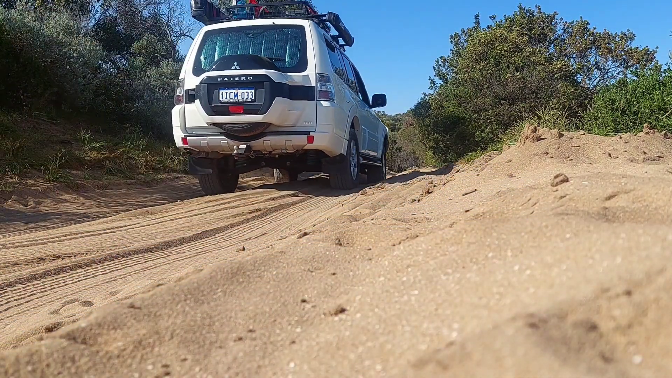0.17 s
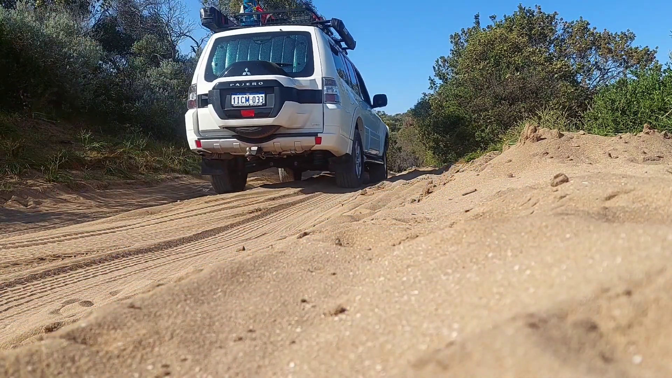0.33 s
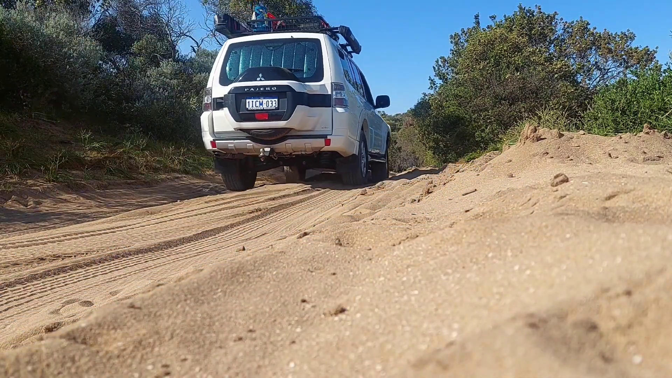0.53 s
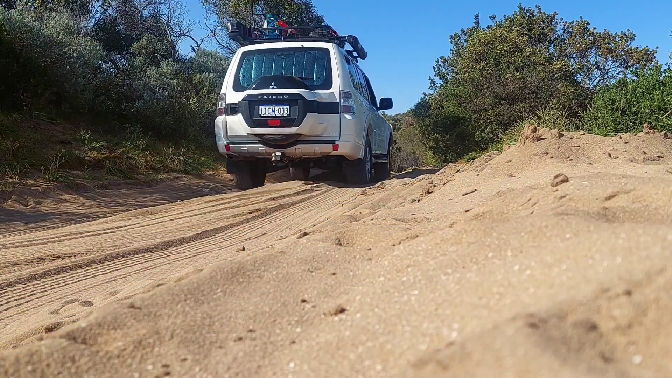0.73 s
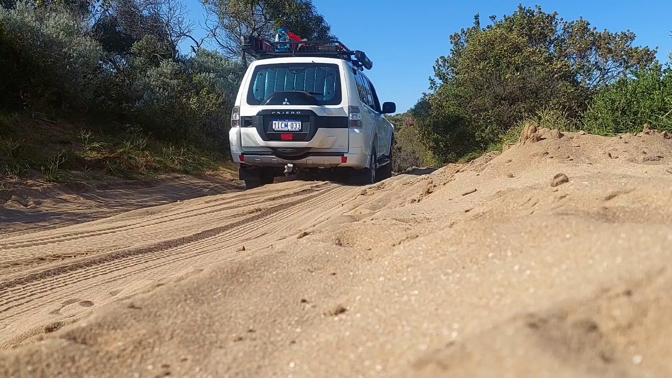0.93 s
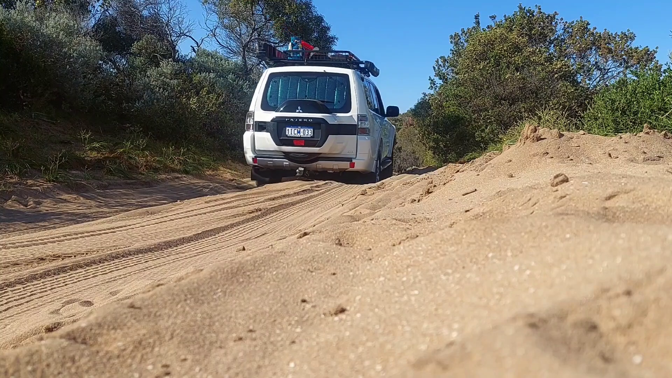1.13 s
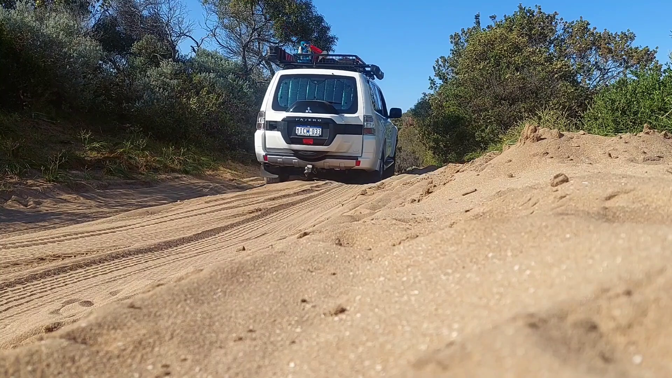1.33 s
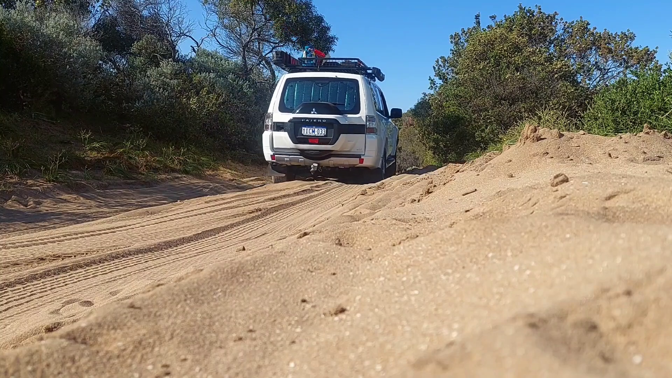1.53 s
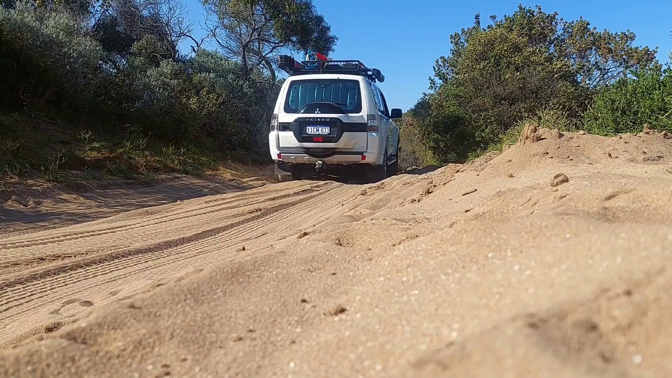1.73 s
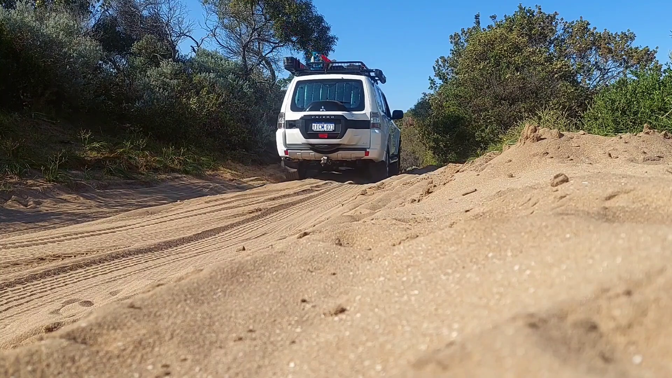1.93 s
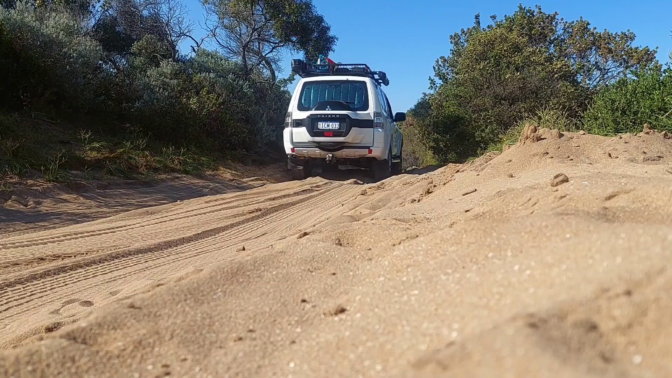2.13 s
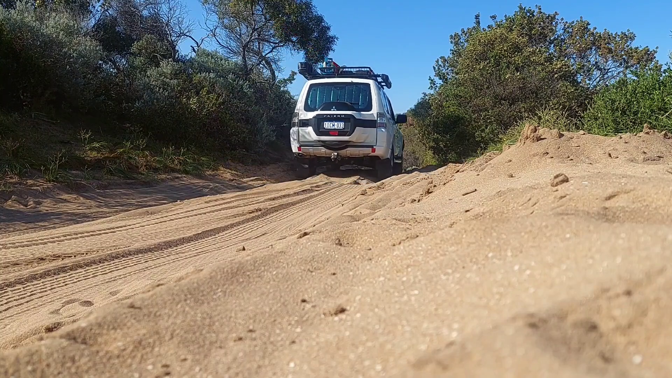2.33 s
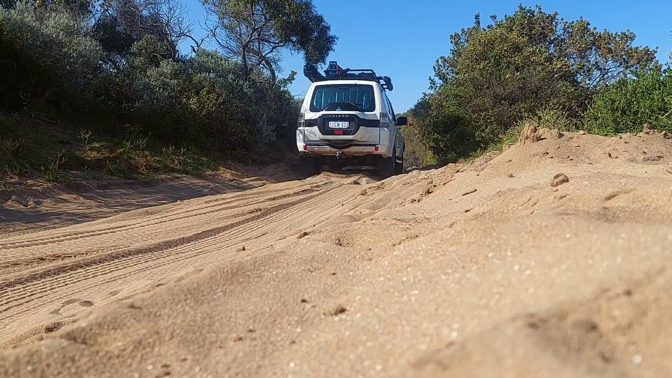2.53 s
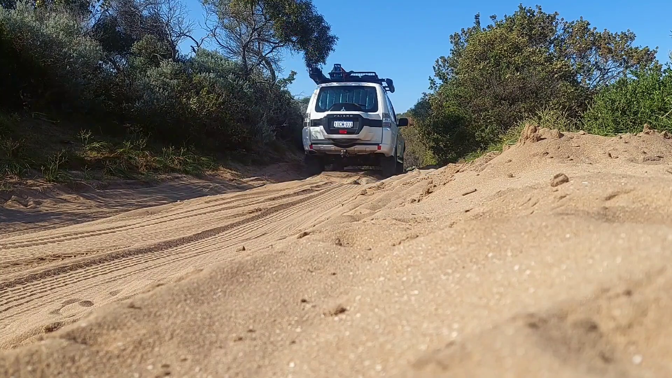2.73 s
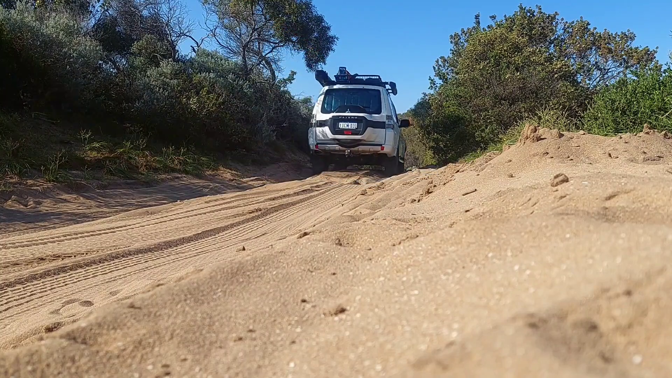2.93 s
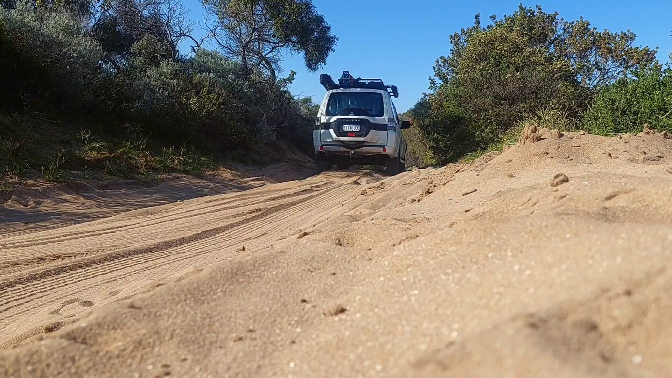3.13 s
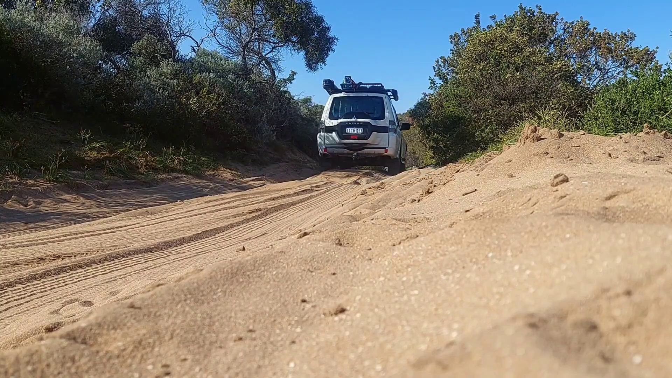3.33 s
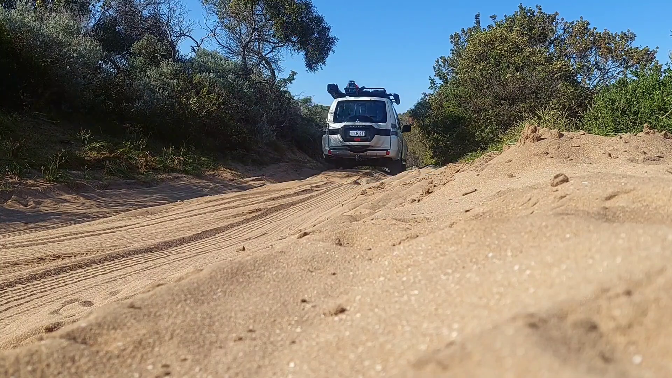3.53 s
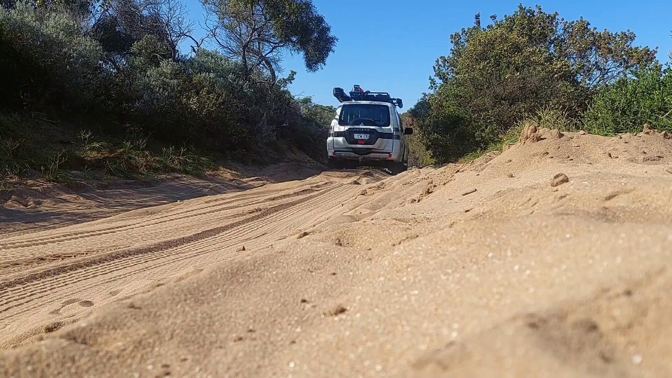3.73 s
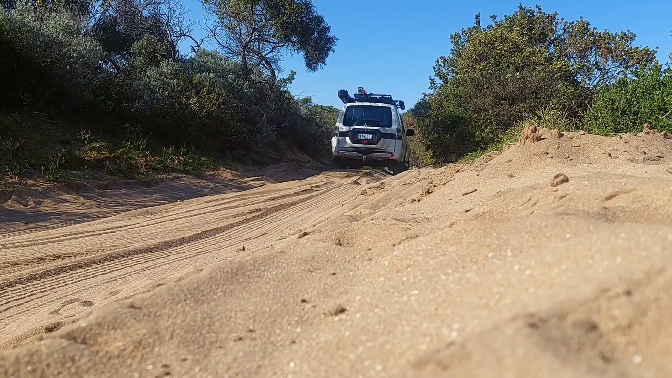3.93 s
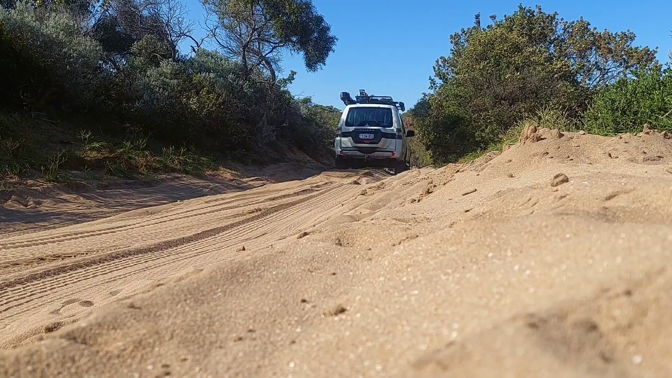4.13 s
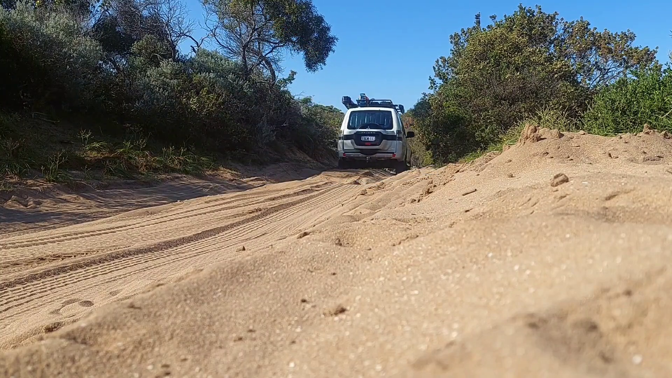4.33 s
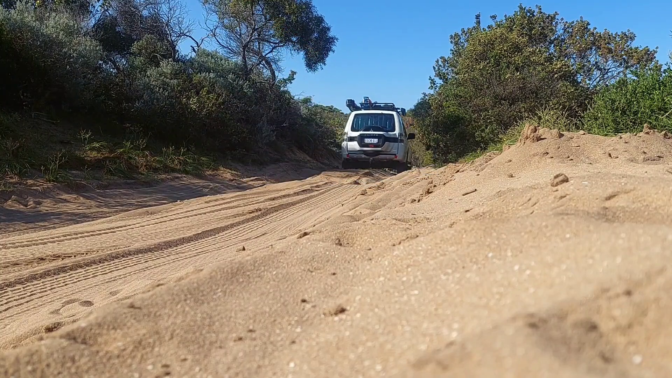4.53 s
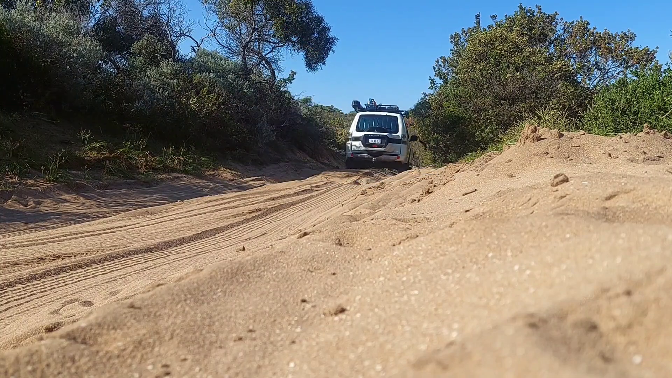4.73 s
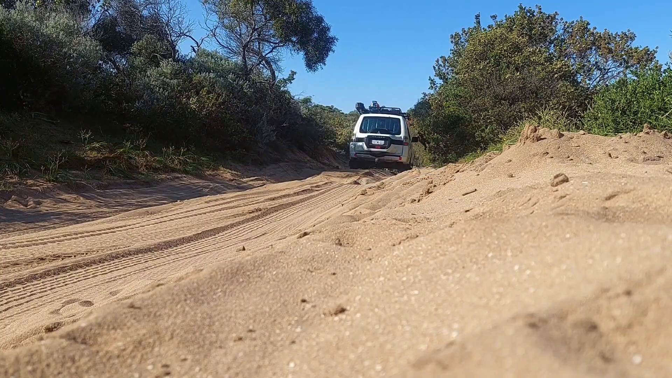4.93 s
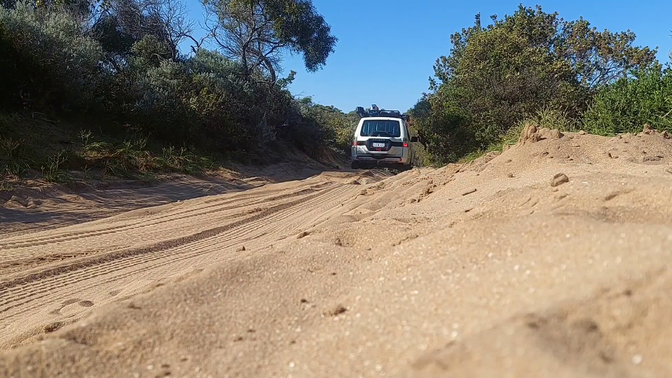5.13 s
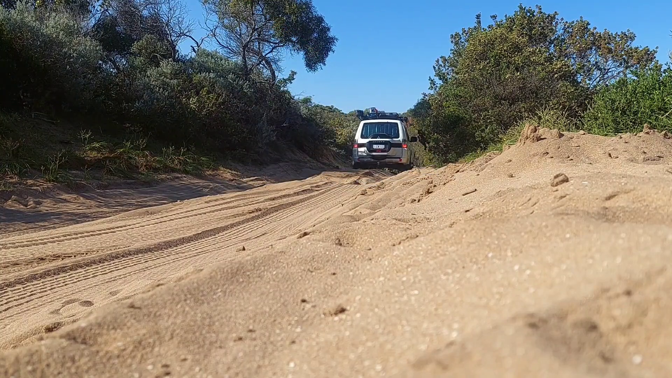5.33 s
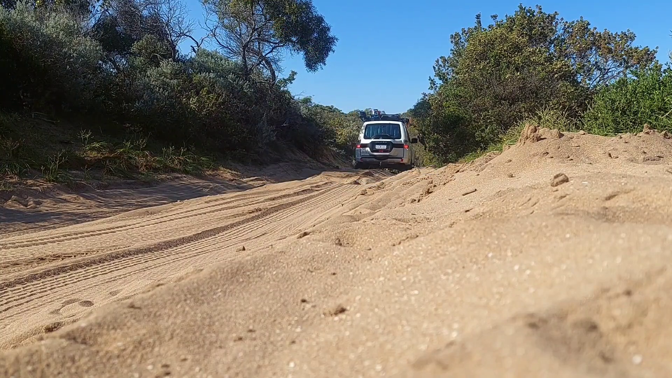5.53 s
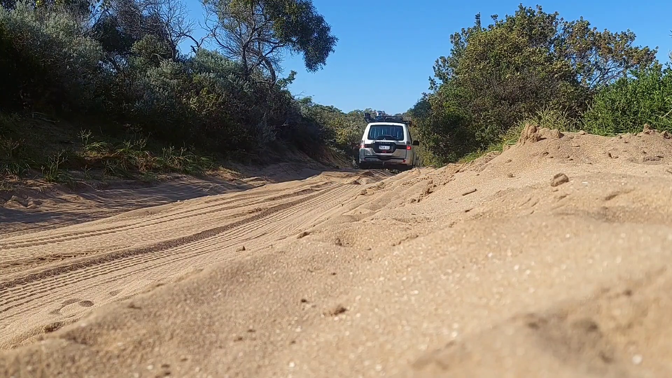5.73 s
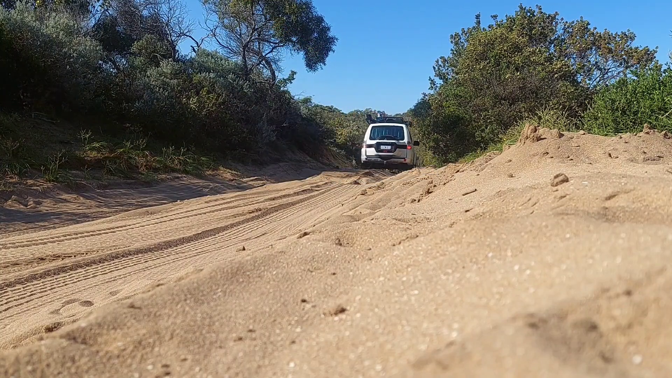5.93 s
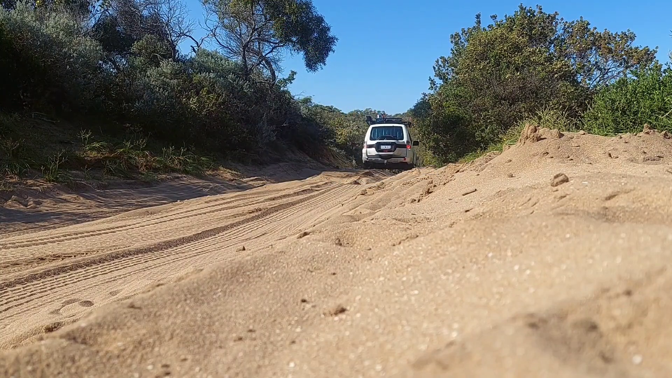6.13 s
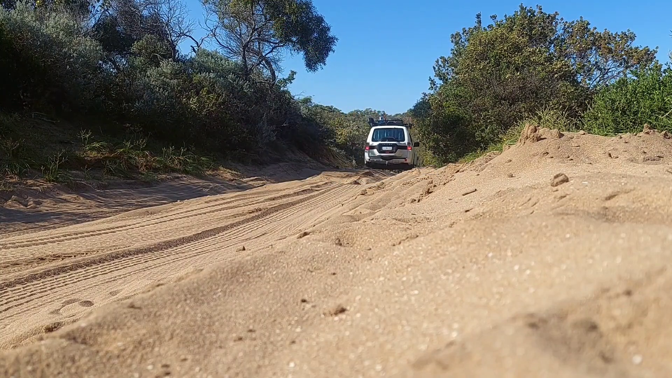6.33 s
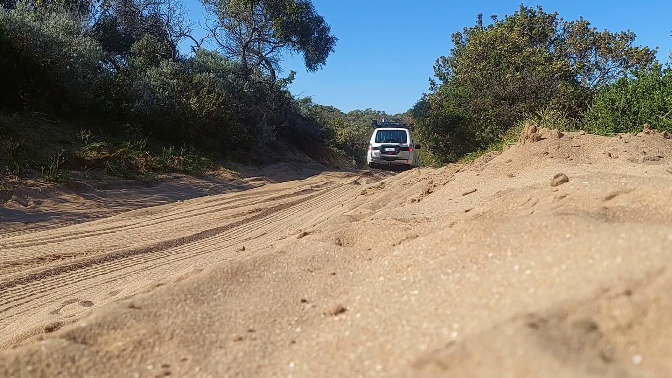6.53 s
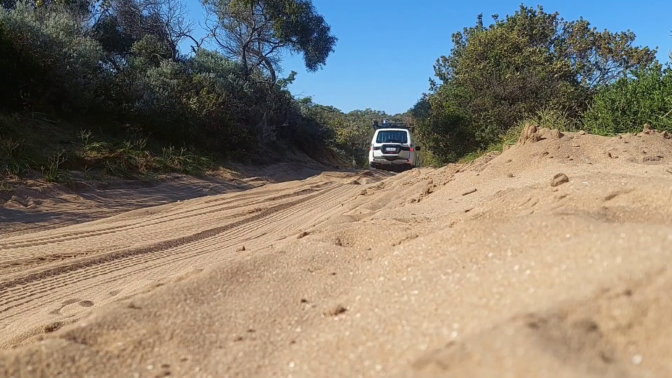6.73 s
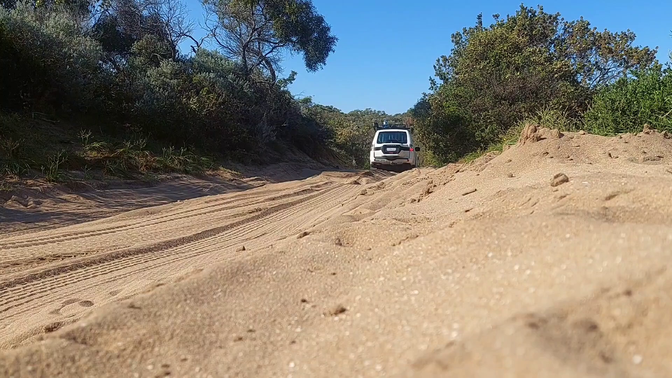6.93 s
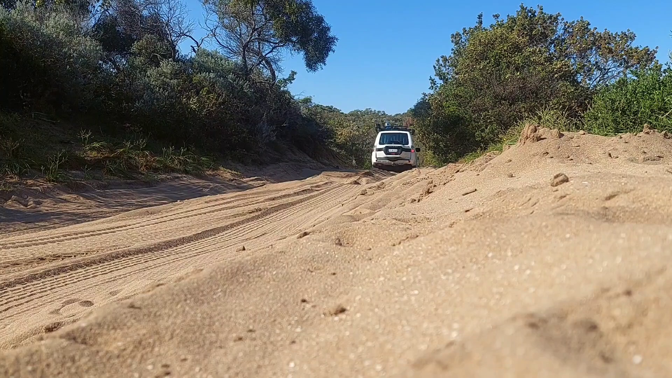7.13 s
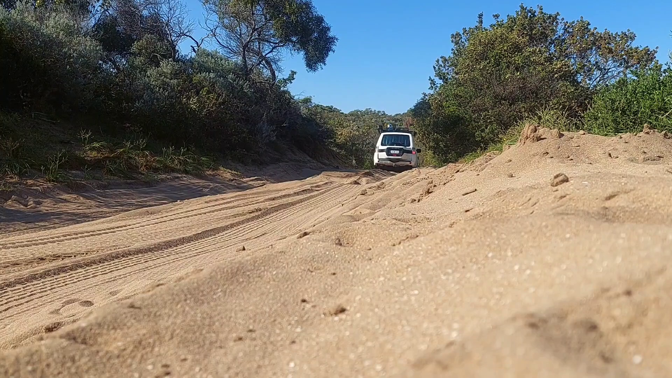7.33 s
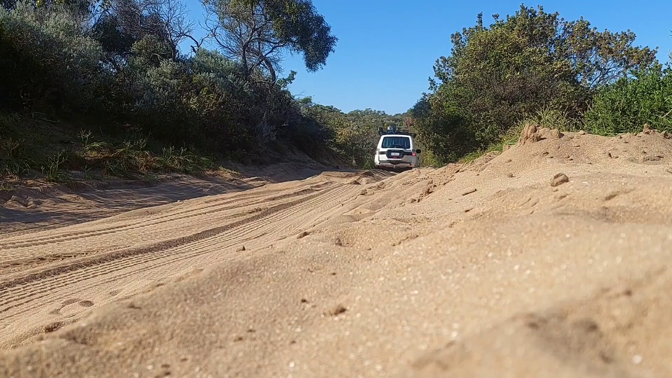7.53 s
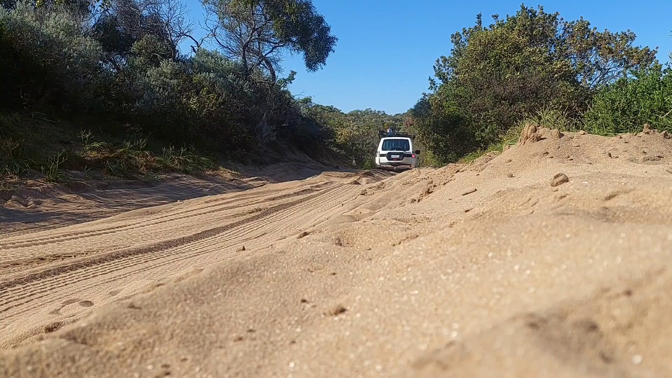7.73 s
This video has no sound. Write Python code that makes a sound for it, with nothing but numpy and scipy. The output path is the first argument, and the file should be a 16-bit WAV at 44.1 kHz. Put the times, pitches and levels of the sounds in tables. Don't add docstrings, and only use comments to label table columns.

```python
import sys
import numpy as np
from scipy import signal
from scipy.io import wavfile
from scipy.ndimage import uniform_filter1d

SR = 44100
rng = np.random.default_rng(int(sys.argv[2]) if len(sys.argv) > 2 else 0)


def wrap_up_sound(samples):
    columns = np.atleast_2d(samples).T
    tamed = np.clip(columns, -1, 1)
    steps = np.round(tamed * 32767).astype(np.int16)
    wavfile.write(sys.argv[1], SR, steps)


def attenuation_scalar(level_db):
    decades = np.asarray(level_db, float) / 20
    return 10 ** decades


N = 342657


def evened(x):
    return x / np.sqrt(np.mean(x ** 2) + 1e-20)


def read(points, hz):
    f, value = np.transpose(points)
    return np.interp(np.log(hz + 1), np.log(f + 1), value)


def columns(rows, t):
    s, *rest = np.transpose(rows)
    return [np.interp(t, s, c) for c in rest]


def add(mix, s, sound):
    part = mix[round(s * SR):][:len(sound)]
    part += sound[:len(part)]


def drift(top_hz):
    steps = rng.standard_normal(N // 64 + 1002)
    lowpass = signal.butter(2, top_hz, fs=SR / 64, output="sos")
    slow = signal.sosfiltfilt(lowpass, steps)[500:-500]
    return np.interp(np.arange(N) / 64, np.arange(len(slow)), evened(slow))


def per_band(colour, hz, lo, hi):
    db = read(colour, hz)
    inside = (hz > lo) & (hz < hi)
    return db - 10 * np.log10(np.sum(attenuation_scalar(2 * db[inside])) * 2 / 3)


# pitch_hz, likeness [0-1]
PORT_LIKENESS = [(60, 0.94), (300, 0.92), (700, 0.73), (1300, 0.22), (3000, 0.02)]
# pitch_hz, left_minus_right_db
PORT_BALANCE = [(60, 1), (500, -4), (1500, -4), (8000, 2.5), (12000, 0)]


def noise(level_db, size, patchy_db):
    hop = size // 4
    frames, hz = N // hop + 5, np.fft.rfftfreq(size, 1 / SR)[:, None]
    a, b, c, d, patches = rng.standard_normal((frames, len(hz), 5)).T
    patches = uniform_filter1d(patches, size=10, axis=0)
    patches = evened(uniform_filter1d(patches, size=8, axis=1))
    same = np.clip(read(PORT_LIKENESS, hz), -1, 1)
    left = a + 1j * b
    right = same * left + np.sqrt(1 - same ** 2) * (c + 1j * d)
    z = np.array([left, right])
    z *= attenuation_scalar(level_db(hz, np.arange(frames) * hop / SR) + patchy_db * patches)
    z *= attenuation_scalar(np.array([.5, -.5])[:, None, None] * read(PORT_BALANCE, hz))
    return signal.istft(z, nperseg=size, noverlap=size - hop)[1][:, :N]


# pitch_hz, level_db per Hz
HISS_COLOUR = [(290, -31), (500, -2.5), (1050, -9), (2380, -10), (2900, -10.5), (3300, -12.5),
               (7570, -20.5), (9790, -15), (15300, -19.5)]
# start_s, half_length_s, level_db
SWISHES = [(0.01, 0.046, -5.5), (1.139, 0.094, 3), (4.992, 0.018, 8.5), (5.27, 0.011, 8), (5.532, 0.011, 7),
           (6.07, 0.036, 5.5), (6.798, 0.0058, 13.5), (7.496, 0.044, 6.5)]


def hiss_and_spray():
    hiss_db, spray_start_db, spray_fade_s = -87.5, 9, 2.4

    def level(f, s):
        treble = np.clip(np.log2((f + 1) / 2500), .3, 1)
        spray_db = spray_start_db * np.exp(-s / spray_fade_s)
        spray_db = spray_db + sum(db * np.exp(-((s - at) / half) ** 2) for at, half, db in SWISHES)
        return per_band(HISS_COLOUR, f, 8100, 15460) + treble * spray_db + hiss_db

    return noise(level, size=512, patchy_db=2.0)


# start_s, peak_db, pitch_hz
KNOCKS = [(4.501, -43, 87), (4.564, -36.5, 84), (4.881, -37, 95), (4.993, -31, 84.5), (5.075, -49, 63.6),
          (5.123, -40, 65.3), (5.163, -41, 76), (5.418, -61, 64), (5.65, -51, 82), (5.87, -44.5, 91.8),
          (6.094, -49, 53)]


def breeze():
    steady_db, steady_start_s, gust_db, gust_s = -67, 5.4, -25.5, .12
    t = np.arange(N) / SR
    band = signal.butter(2, [40, 140], "bandpass", fs=SR, output="sos")
    lumps = evened(signal.sosfilt(band, rng.standard_normal(N))) * attenuation_scalar(1.0 * drift(2.6))
    gusts = sum(attenuation_scalar(db + gust_db) * np.exp(-((t - s) / gust_s) ** 2) for s, db, hz in KNOCKS)
    out = lumps * (gusts + attenuation_scalar(steady_db) * np.clip(t - steady_start_s, 0, 1))
    for s, db, hz in KNOCKS:
        u = np.arange(-1.3, 2.6, hz / SR)
        push = np.exp(-(u / np.where(u < 0, .6, .95)) ** 2)
        add(out, s, attenuation_scalar(db + 7) * push * np.cos(2 * np.pi * u * (1 - 0.051 * u) - .1))
    return out * attenuation_scalar(np.array([[-17.], [0]]))


def bushes(x, t60):
    at = np.arange(100, 11900, 20) + rng.integers(0, 20, (2, 590))
    taps = np.zeros((2, 12040))
    shape = attenuation_scalar(-60 * at / SR / t60) * (1 - np.exp(-at / SR / 0.0075))
    np.put_along_axis(taps, at, rng.choice([-1., 1.], at.shape) * shape, axis=1)
    flutter = .65 + .75 * np.array([drift(300), drift(300)])
    return flutter * signal.oaconvolve(x[None], taps / np.linalg.norm(taps[0]), axes=1)[:, :N]


def calls(shape, rows):
    out, step = np.zeros(N), np.arange(shape[0][0], shape[-1][0], 1 / SR)
    hz, tone_db, octave_db = uniform_filter1d(columns(shape, step), size=60, mode="nearest")
    ends = np.clip(np.minimum(step - step[0], step[-1] - step) / .002, 0, 1)
    for s, db, pitch, reach, lead_db in rows:
        sung_hz = pitch * (hz + (reach - 1) * np.maximum(hz - hz[-1], 0))
        turns = 2 * np.pi * np.cumsum(sung_hz) / SR
        level = np.sqrt(2) * ends * attenuation_scalar(db + lead_db * np.clip(-step / .004, 0, 1))
        voice = attenuation_scalar(tone_db) * np.sin(turns) + attenuation_scalar(octave_db) * np.sin(2 * turns)
        add(out, s + step[0], level * voice)
    return out


def birds(strokes, sung, pan_db, lag, echo_db, t60, shimmer_db):
    out = sung.copy()
    for s, length, start_hz, middle_hz, end_hz, db in strokes:
        u = np.linspace(-1, 1, round((length + .002) * SR))
        bend = u ** 2 * ((start_hz + end_hz) / 2 - middle_hz)
        hz = middle_hz + u * (end_hz - start_hz) / 2 + bend
        swell = (1 - u ** 2) ** .6 * 1.2
        add(out, s - .001, np.sqrt(2) * attenuation_scalar(db) * swell * np.sin(2 * np.pi * np.cumsum(hz) / SR))
    seen = out * attenuation_scalar(shimmer_db * drift(78))
    right = np.roll(seen, round(lag))
    direct = np.array([seen * attenuation_scalar(pan_db / 2), right * attenuation_scalar(-pan_db / 2)])
    return direct + attenuation_scalar(echo_db) * bushes(out, t60) * attenuation_scalar(np.array([[pan_db / 4], [-pan_db / 4]]))


def straight_strokes(rows):
    return [(s, length, a, .4 * a + .6 * b, b, db) for s, length, a, b, db in rows]


# start_s, level_db, pitch_hz
CHIPS = [(3.2891, -97, 2530), (3.459, -80, 3286), (4.6423, -81, 2552), (5.3901, -95, 3500),
         (5.8456, -75, 3540), (5.986, -80, 3190), (6.4802, -79, 2520), (6.6994, -79, 2840),
         (7.0483, -94, 3004), (7.077, -80, 2910), (7.1691, -84, 2820), (7.2517, -77.5, 2997),
         (7.3337, -80, 2957), (7.4078, -78, 2920), (7.666, -77, 3006), (7.7397, -88, 2670)]
# from_peak_s, pitch_hz, level_db, octave_level_db
CUP = [(-.038, 3900, -13, -54), (-.033, 2994, -10.5, -74), (-.026, 2607, -6, -42), (-.016, 2520, -9.5, -52),
       (-.007, 2926, 3, -48), (0, 4435, -12, -60), (.004, 3250, 3, -43), (.011, 3030, -0.5, -45),
       (.02, 2730, -23, -60)]
# peak_s, level_db, pitch_factor, reach above the last note, lead_db before the peak
CUPS = [(3.872, -58.5, 0.96, 0.56, -7.5), (4.115, -71.5, 0.96, 0.49, 13), (4.325, -60.5, 0.95, 0.83, 5.5),
        (4.534, -52.5, 0.96, 0.98, -4.5), (4.755, -56, 0.96, 0.78, 0.5), (5.045, -61.5, 0.94, 0.65, 1.5),
        (5.318, -64.5, 0.92, 0.8, 0)]


def birds_right():
    chips = [(s - .006, .022, 0.82 * hz, hz, 0.99 * hz, db - 5.5) for s, db, hz in CHIPS]
    return birds(chips, calls(CUP, CUPS), pan_db=-4.5, lag=-3.0, echo_db=-10.0, t60=0.18, shimmer_db=2.0)


# from_peak_s, pitch_hz, level_db, octave_level_db
FAR_TSEET = [(-.032, 2600, -28, -26), (-.022, 2620, -22, -18), (-.009, 2750, -24, -16),
             (-.004, 3100, -40, -22), (.001, 3800, -40, -14), (.005, 3300, -36, -8), (.0085, 3050, -32, 0),
             (.014, 3000, -34, -1), (.019, 2980, -42, -16)]
WHIP = [(-.019, 2535, -9, -51.5), (-.008, 3177, 0, -41), (-.003, 3775, -12, -41), (0, 4770, -11, -42),
        (.004, 3900, -5, -35), (.008, 3540, -0.5, -44), (.025, 3550, -2, -43), (.033, 3425, -16.5, -54)]
# peak_s, level_db, pitch_factor, reach above the last note, lead_db before the peak
LEFT_TSEETS = [(.454, -63, 1, 1.5, -23), (1.776, -70, 1.02, 0.94, -22), (2.17, -81, 1.05, 0.66, -20),
               (2.679, -80, .95, .8, -14), (2.713, -76.5, 1.02, 0.78, -3), (3.14, -86, 1.06, .6, -13),
               (6.975, -72.5, 0.95, 1.5, 1), (7.497, -73, 0.91, 1.2, -20), (7.466, -78, 0.92, 0.75, 2),
               (7.524, -78.5, 1.02, .8, -18), (7.697, -80, 0.96, 0.43, -7)]
LEFT_WHIPS = [(.852, -70, 0.98, 1, -30), (.982, -68, 1.0, 1, -31), (1.083, -63.5, 0.99, 0.91, 1),
              (1.208, -67, 0.97, 0.9, 2.5)]
# start_s, length_s, start_hz, end_hz, level_db
LEFT_STROKES = [(.113, 0.008, 5350, 5300, -76.5), (.134, 0.0088, 4740, 4580, -71.5),
                (.146, 0.015, 4180, 4280, -74.5), (.186, 0.029, 4280, 4100, -80),
                (.42, 0.021, 6170, 5580, -68), (.471, 0.01, 5135, 4200, -70.5),
                (.479, 0.02, 3850, 3750, -80), (.915, .018, 3450, 3480, -79),
                (.953, 0.0082, 3900, 2500, -67.5), (2.163, .009, 5180, 4965, -71),
                (5.472, 0.012, 4240, 3400, -74), (6.53, 0.026, 2650, 3140, -75.5),
                (6.3, 0.04, 2480, 3350, -84)]


def birds_left():
    sung = calls(FAR_TSEET, LEFT_TSEETS) + calls(WHIP, LEFT_WHIPS)
    return birds(straight_strokes(LEFT_STROKES), sung,
                 pan_db=13.5, lag=5.4, echo_db=-2.5, t60=0.22, shimmer_db=4.0)


# from_peak_s, pitch_hz, level_db, octave_level_db
TSEET = [(-.032, 2700, -28, -26), (-.022, 2570, -17, -16), (-.009, 2650, -17, -18), (-.005, 2720, -40, -28),
         (.002, 3750, -36, -5), (.0055, 3200, -34, 0), (.0085, 2920, -32, 0), (.013, 3080, -34, -6),
         (.017, 3080, -42, -20)]
HOOK = [(-.052, 2800, -12, -50), (-.04, 2690, -5, -40), (-.026, 2580, 0, -40), (-.013, 2850, -4, -45),
        (-.007, 3500, -20, -44), (0, 4700, 0, -34), (.005, 5050, -18, -45), (.012, 4600, -34, -55),
        (.018, 3500, -22, -50)]
# peak_s, level_db, pitch_factor, reach above the last note, lead_db before the peak
FRONT_TSEETS = [(0.073, -70.5, 0.99, 0.6, 8), (2.136, -71, 0.92, 0.58, -10), (4.321, -73, 0.98, 1, -21),
                (4.672, -71.5, 0.98, .8, 8), (4.982, -55.5, 1.01, 0.78, -3), (5.262, -57, 0.984, 1, -1),
                (5.527, -56, 1, 0.88, 1.5), (6.073, -55.5, 1.04, 0.66, -32)]
FRONT_WHIPS = [(5.603, -63, 0.99, 1.5, -7.5), (5.73, -65.5, 1, 0.69, -7)]
HOOKS = [(6.795, -53, 1, 1, 0.0019)]
# start_s, length_s, start_hz, end_hz, level_db
FRONT_STROKES = [(2.376, 0.017, 3900, 2918, -83), (2.709, 0.0054, 4946, 4996, -79),
                 (6.064, 0.01, 5850, 5940, -60), (6.069, 0.01, 5200, 3300, -80),
                 (6.548, .028, 4000, 3260, -78.5), (6.647, 0.021, 2930, 2170, -77.5),
                 (7.685, .012, 5200, 6000, -86), (2.187, .008, 5050, 4800, -73),
                 (2.73, .008, 4950, 4800, -78), (.59, .04, 3320, 3300, -85), (.422, .022, 9000, 8300, -84),
                 (6.952, .018, 5050, 4950, -85), (4.977, .007, 4780, 4850, -75),
                 (5.258, .007, 4500, 4300, -83), (7.252, .008, 5900, 5600, -82),
                 (7.488, .012, 2600, 3000, -77), (7.458, .007, 2650, 3100, -79),
                 (1.2, .022, 2400, 2640, -80), (1.21, .02, 2950, 3050, -73),
                 (7.466, 0.016, 3150, 2980, -76), (7.574, 0.022, 2500, 3080, -84),
                 (4.68, 0.013, 4530, 4080, -82), (5.49, 0.06, 3400, 3500, -77),
                 (6.505, .04, 2600, 3300, -86), (.885, .06, 3540, 3540, -84), (1.02, .05, 3540, 3540, -83),
                 (1.125, .05, 3560, 3540, -82)]
# start_s, level_db, start_hz, end_hz
FLICKS = [(1.746, -79.5, 6593, 5250), (1.796, -78, 5164, 3630), (2.052, -90, 4585, 3500),
          (2.19, -75.5, 5018, 4026), (2.734, -78, 4820, 3650), (3.161, -78.5, 5348, 4897),
          (3.185, -80, 5030, 3800), (6.428, -81, 4200, 3193), (6.639, -82, 4500, 1830),
          (7.248, -86, 6800, 5300)]
# start_s, length_s, level_db, top_hz
ARCHES = [(1.263, 0.061, -76, 2650), (2.546, 0.039, -76, 3120), (2.716, 0.041, -75, 3150),
          (2.908, 0.043, -76.5, 3087), (5.384, 0.048, -79.5, 3550), (5.466, 0.054, -74, 3450),
          (5.88, 0.024, -79.5, 2710), (5.928, 0.025, -71.5, 2965), (6.168, 0.024, -76.5, 2650),
          (6.216, .026, -74, 2888), (7.49, 0.03, -87, 3020)]
# start_s, length_s,
# start_hz, middle_hz, end_hz, level_db
BOWS = [(6.035, .026, 6050, 6680, 6300, -59), (6.088, .013, 5150, 4300, 3400, -62),
        (6.93, .021, 5250, 5450, 6500, -84)]
FAINT_NOTES = [(6.81, .016, 3100, 3150, 3200, -76), (6.84, .1, 3150, 3220, 3170, -81),
               (6.678, .014, 5200, 5600, 6600, -85), (6.691, .008, 6000, 5900, 5850, -80),
               (6.448, .012, 3300, 2700, 2300, -84), (2.5, .03, 2050, 2250, 2350, -87)]


def birds_ahead():
    flicks = [(s, .013, hi, 0.37 * hi + .6 * lo, lo, db) for s, db, hi, lo in FLICKS]
    arches = [(s, length, .86 * hz, .99 * hz, 0.982 * hz, db) for s, length, db, hz in ARCHES]
    strokes = straight_strokes(FRONT_STROKES) + flicks + arches + BOWS + FAINT_NOTES
    sung = calls(TSEET, FRONT_TSEETS) + calls(WHIP, FRONT_WHIPS) + calls(HOOK, HOOKS)
    return birds(strokes, sung, pan_db=0.5, lag=2, echo_db=-6.5, t60=0.29, shimmer_db=3.0)


# start_s, peak_db
SNAPS = [
    (0.564, -77),
    (0.7865, -62.5),
    (1.114, -64.5),
    (1.1406, -64.5),
]


def snaps():
    out, t = np.zeros(N), np.arange(900) / SR
    for s, db in SNAPS:
        crack = np.diff(rng.standard_normal(len(t) + 1))
        add(out, s, attenuation_scalar(db - 1 - 60 * t / .014) * crack)
    return out * attenuation_scalar(np.array([[1.5], [-6]]))


LIFT_S, BOOST_S = 3.8, 0.688
ROLL_DB = -37


def distance_db(s):
    return -20 * np.log10(1 + s / 3.43)


# start_s, level_db
EFFORT = [(0, -2), (.12, 4.5), (.24, 2), (.66, 0), (.9, 8.5), (1.25, 3.5), (1.49, 3), (1.73, 6),
          (2.76, 3.5), (3.05, 5), (3.23, -0.5), (3.45, 4.5), (3.78, 0), (4.08, -6.5), (4.5, -5.5),
          (6.6, -11), (7.5, -9), (7.72, -14)]


def effort_db(s):
    return columns(EFFORT, s)[0]


# start_s, firing_hz
REVS = [(0, 23.3), (.1, 25.8), (.21, 27.4), (.69, 27.4), (.92, 29.9), (1.25, 30.2), (1.57, 29.9),
        (1.73, 31.3), (2.2, 30.9), (2.78, 30.6), (3.13, 33.1), (3.3, 33.1), (3.65, 34), (3.78, 33.9),
        (3.9, 32.5)]
COASTING = [(3.9, 27.5), (4.2, 24), (4.5, 22.3), (5.3, 20.4), (6.6, 19.6), (7.5, 20.2)]


def firing(t):
    hz, idle_hz = columns(REVS, t)[0], columns(COASTING, t)[0]
    turns, idle_turns = 2 * np.pi * np.cumsum([hz, idle_hz], axis=1) / SR + 0.0042 * drift(2.2)
    return hz, turns, idle_turns


def orders(turns, levels, waver_db, slip, smear):
    out = 0
    for k, db, lag in levels:
        level, phase = waver_db * drift(6), slip * drift(4)
        out = out + np.sqrt(2) * attenuation_scalar(db + level) * np.cos(k * turns - lag + phase + smear * k ** 2)
    return out


# multiple, level_db, share of the effort followed
LOADED = [(1, -57, .1), (2, -40, 0.45), (3, -38.5, 0.83), (3.5, -54, 1), (4, -42, 1), (5, -48, 0.77),
          (6, -50.5, 0.33), (7, -53.5, 0.5), (8, -52.5, 0.48), (9, -57, 0.98), (10, -61.5, 0.77),
          (11, -59, 0.25), (12, -73.5, 0.19), (13, -67.5, 0.2), (14, -70, 0.2), (15, -66.5, 0.68)]
# pitch_hz, width_hz, level_db
PIPE = [(122.45, 4.1, 5.5), (185, 6.4, -14), (209.6, 18.2, 15), (342.4, 10, 4), (456.7, 14, 4.5)]
# multiple, level_db
IDLE = [(2, -4), (3, -13), (4, -6.5), (5, -14.5), (6, -7.5), (7, -11), (8, -16)]


def exhaust(t, hz, turns, idle_turns, lifted):
    boost = np.clip((t - BOOST_S) / 0.097, .25, 1) * np.interp(t, [2.85, 3.2], [1, .6])
    away_db, effort = distance_db(t), effort_db(t)
    loaded = []
    for k, db, share in LOADED:
        pipe_db = sum(top_db / (1 + ((k * hz - f) / w) ** 2) for f, w, top_db in PIPE)
        lag = sum(np.sign(top_db) * np.arctan((k * hz - f) / w) for f, w, top_db in PIPE)
        loaded.append((k, db + away_db + share * effort + boost * pipe_db, lag))
    idle = [(k, db + ROLL_DB + away_db + effort, 0) for k, db in IDLE]
    pulling = orders(turns, loaded, waver_db=.9, slip=.07, smear=-.04)
    rolling = orders(idle_turns, idle, waver_db=2.5, slip=0.25, smear=0.301)
    return (1 - lifted) * pulling + lifted * rolling


# start_s, pitch_hz, level_db
HUM = [(3.5, 55, -68), (3.85, 54.9, -52), (4.08, 59.2, -65), (4.3, 71, -56), (4.57, 79.95, -51),
       (4.85, 76.8, -54.5), (5.2, 72.7, -53), (5.3, 67.8, -59.5), (5.45, 63.2, -50.5), (5.75, 55.27, -61.5),
       (6.0, 54.7, -65), (6.5, 54.87, -60.5), (6.85, 53.9, -72.5), (7.1, 54.3, -61.5), (7.4, 64.05, -53.5),
       (7.57, 72.07, -53.5), (7.76, 79, -64)]


def driveline(t):
    hz, db = columns(HUM, t)
    return np.sqrt(2) * attenuation_scalar(db + 6) * np.cos(2 * np.pi * np.cumsum(hz) / SR + 0.16 * drift(4.4))


# pitch_hz, level_db per Hz
ROAR_COLOUR = [(18, -45), (35, -23), (60, -11), (130, -8), (220, -13)]
ROAR_TOP = [(340, -24), (450, -24), (765, -43.5), (1020, -52), (1500, -56.5), (2500, -64), (3300, -90)]
RUMBLE_COLOUR = [(25, -11), (45, -6), (70, 13), (130, 1.5), (200, -37.5), (350, -42), (600, -72.5)]
# start_s, half_length_s, pitch_hz,
# level_db
SCUFFS = [(.83, 0.09, 800, 4.5), (1.06, 0.046, 1230, 8), (1.76, 0.044, 760, 7), (3.7, 0.055, 180, 2),
          (4.22, 0.046, 423, 9), (4.57, .05, 290, 5), (4.03, .06, 270, 5), (.8, .08, 1550, 4),
          (4.89, .025, 250, 8), (5.03, .035, 290, 9), (5.21, .03, 270, 7), (3.6, .05, 450, 4)]


def roar(t, hz):
    roar_db, effort_share, lift_db = -53.5, 0.75, -4.5
    bright_db, dulling_db_per_s, lifted_bright_db = 4.5, 2.5, -19
    rev_db, rev_bright_db = 0.1545, 0.07
    crest_s, crest_db = 3.09, -1.
    rising = np.maximum(np.gradient(hz) * SR, 0) * (t > BOOST_S)
    revving = uniform_filter1d(rising, size=4000)

    def level(f, s):
        effort, off = effort_db(s), np.clip((s - LIFT_S) / 0.66, 0, 1)
        revs = np.interp(s, t, revving)
        level_db = roar_db + 0.78 * distance_db(s) + effort_share * effort + lift_db * off + rev_db * revs
        tilt = (1 - off) * (bright_db - dulling_db_per_s * s + rev_bright_db * revs) + off * lifted_bright_db
        engine_db = per_band(ROAR_COLOUR + ROAR_TOP, f, 230, 500) + level_db - 2
        engine_db = engine_db + tilt * np.clip(np.log2((f + 1) / 330), 0, 2)
        engine_db = engine_db + crest_db * np.clip((s - crest_s) / 0.29, 0, 1) * (1 - off) * (f > 240)
        engine_db = engine_db - 1.3 * (s < BOOST_S)
        for at, half, mid_hz, db in SCUFFS:
            octaves = np.log2((f + 1) / mid_hz)
            engine_db = engine_db + db * np.exp(-((s - at) / half) ** 2 - (octaves / 0.39) ** 2)
        tyres_db = per_band(RUMBLE_COLOUR, f, 40, 150) + ROLL_DB + distance_db(s) + effort
        tyres = attenuation_scalar(2 * tyres_db - 6.5) * np.interp(s, [3.4, 4.], [0, 1])
        return 10 * np.log10(attenuation_scalar(2 * engine_db) + tyres)

    return noise(level, size=2048, patchy_db=1.48)


def car():
    t = np.arange(N) / SR
    lifted = np.clip((t - LIFT_S) / 0.12, 0, 1)
    hz, turns, idle_turns = firing(t)
    beat = exhaust(t, hz, turns, idle_turns, lifted) + driveline(t)
    beat *= attenuation_scalar(.8 * drift(24))
    late = np.pad(beat, (5, 0), "edge")[:N]
    ports = np.array([late * attenuation_scalar(-7.5), beat * attenuation_scalar(-4.5)])
    throb = 1 + .3 * np.cos((1 - lifted) * turns + lifted * idle_turns + 3.5)
    return ports + throb * roar(t, hz)


def scene():
    flock = birds_right() + birds_left() + birds_ahead()
    return hiss_and_spray() + breeze() + flock + snaps() + car()


def top_cut(x):
    return signal.sosfilt(signal.butter(12, 15410, fs=SR, output="sos"), x)


def record(dry):
    return top_cut(dry)


dry = scene()
out = record(dry)
wrap_up_sound(out)
```